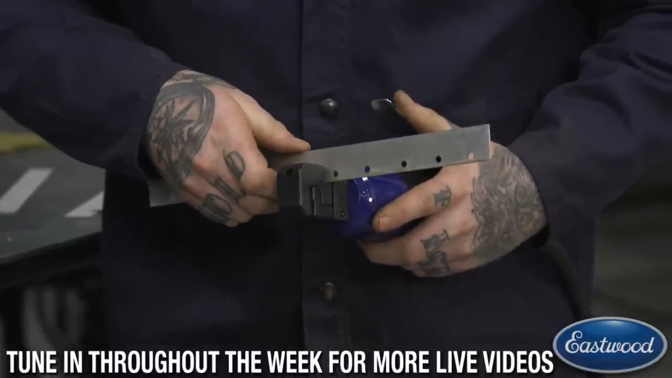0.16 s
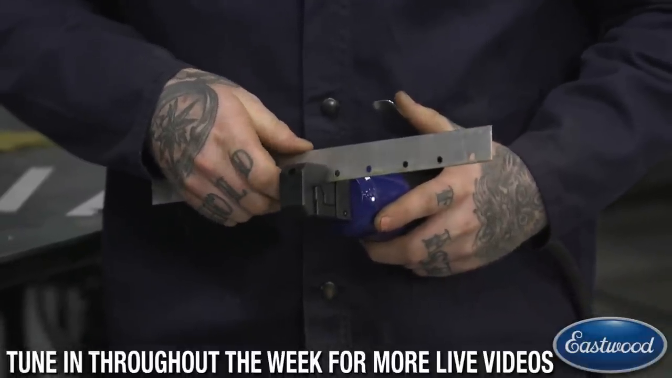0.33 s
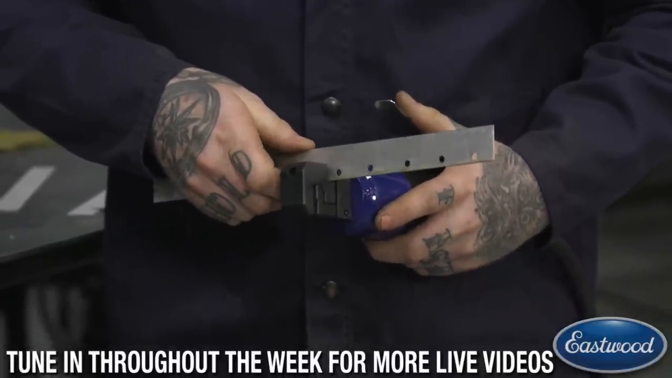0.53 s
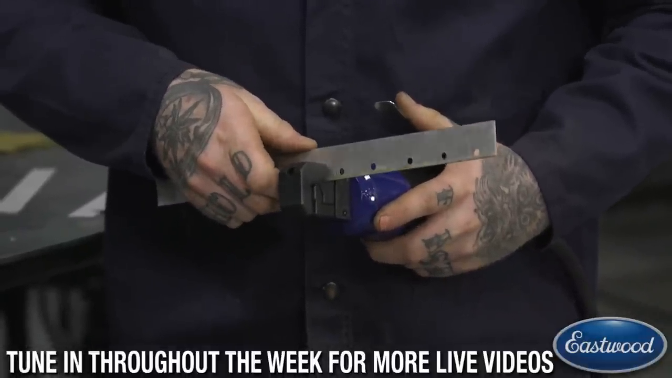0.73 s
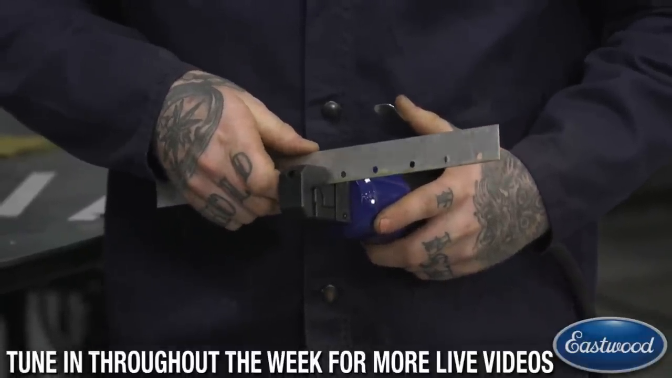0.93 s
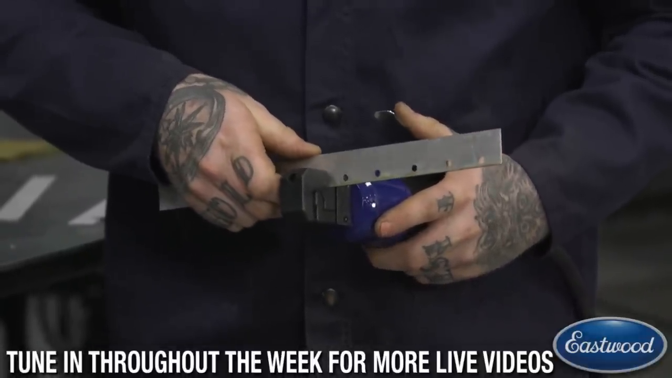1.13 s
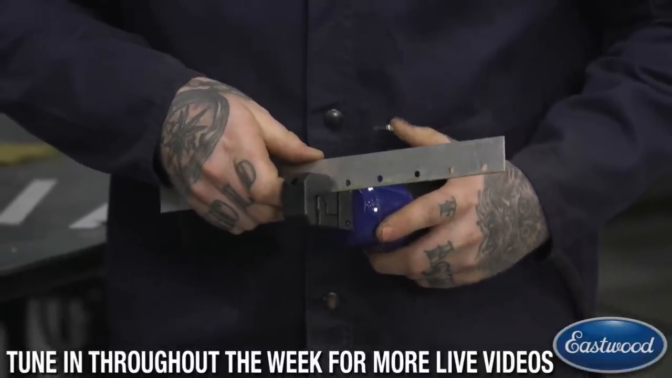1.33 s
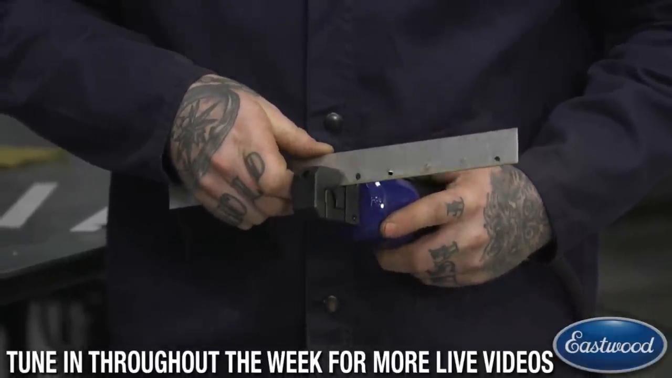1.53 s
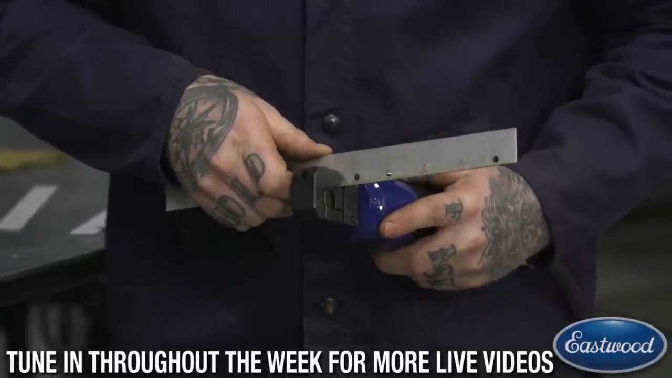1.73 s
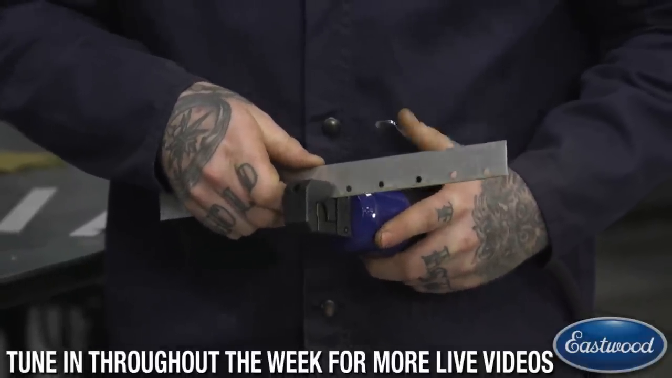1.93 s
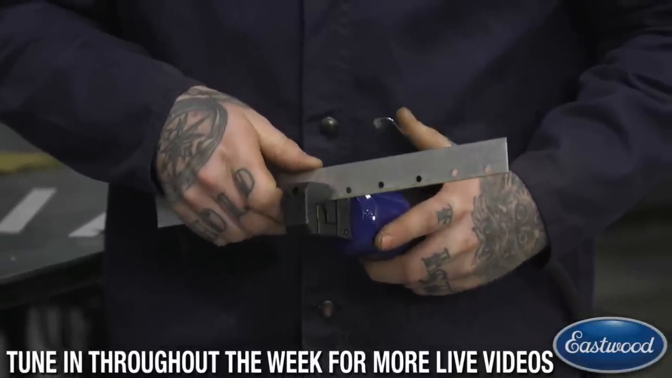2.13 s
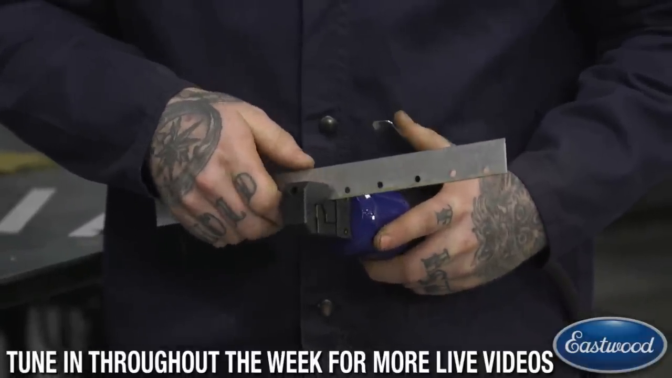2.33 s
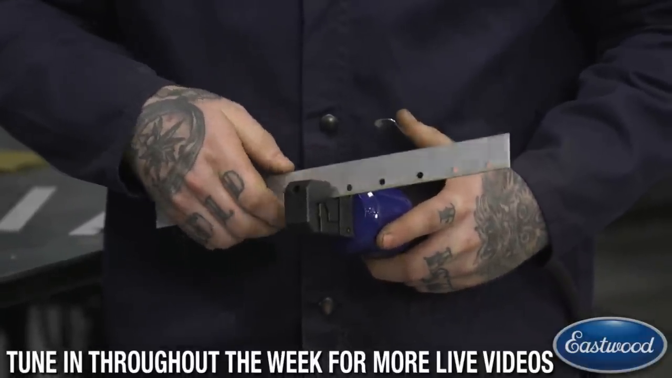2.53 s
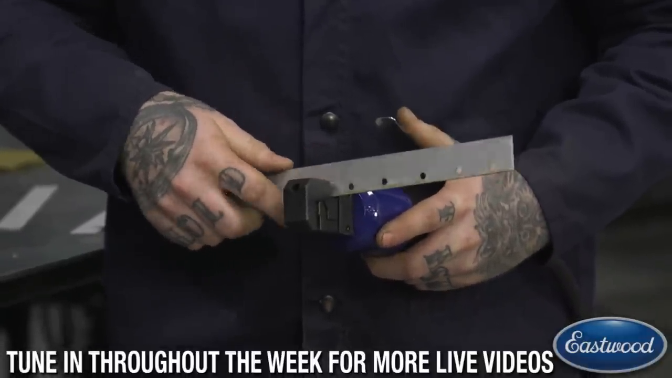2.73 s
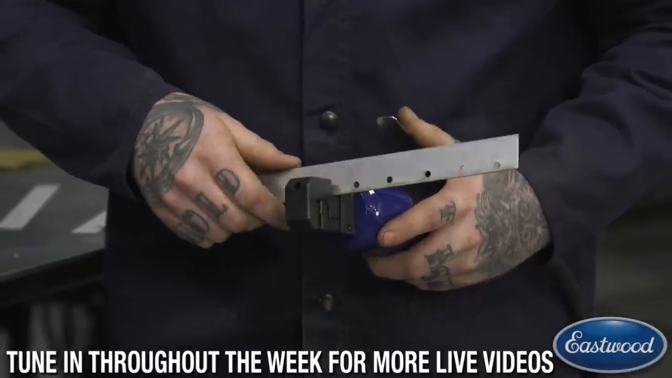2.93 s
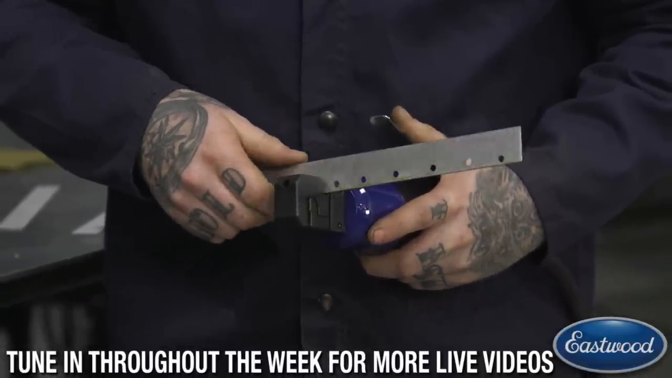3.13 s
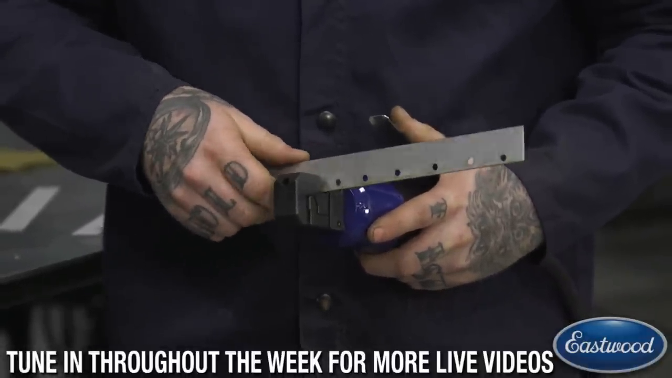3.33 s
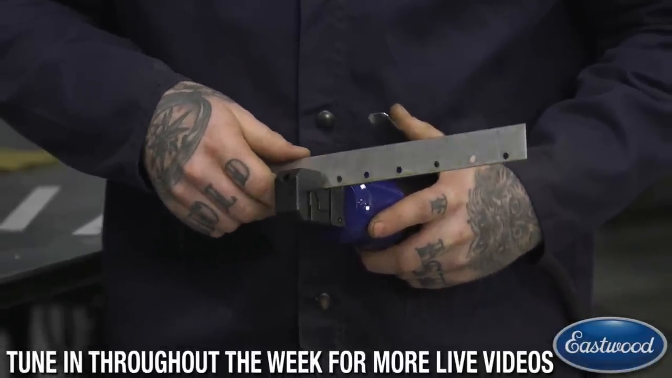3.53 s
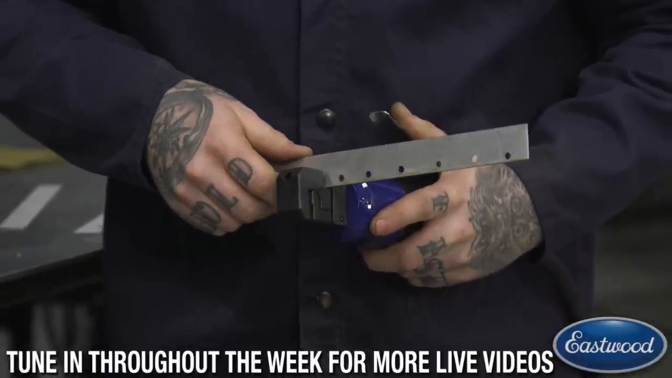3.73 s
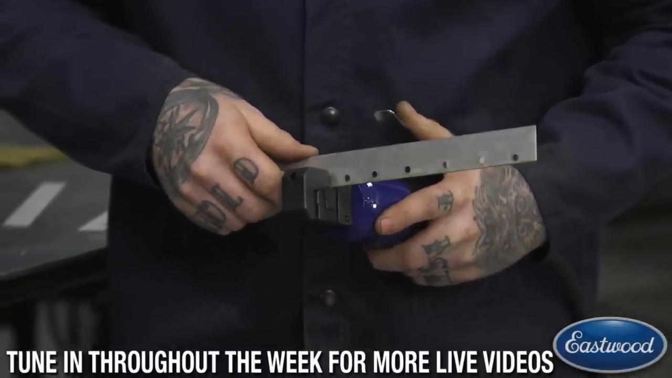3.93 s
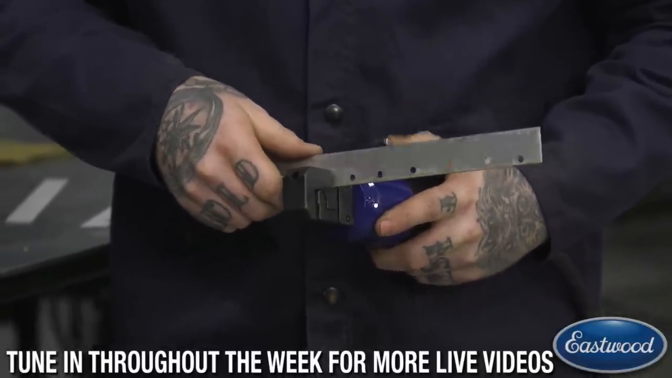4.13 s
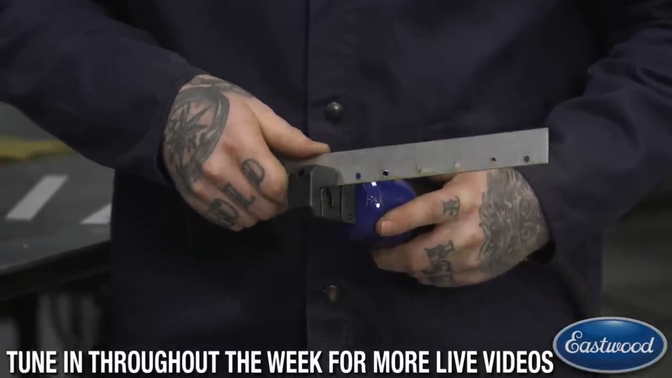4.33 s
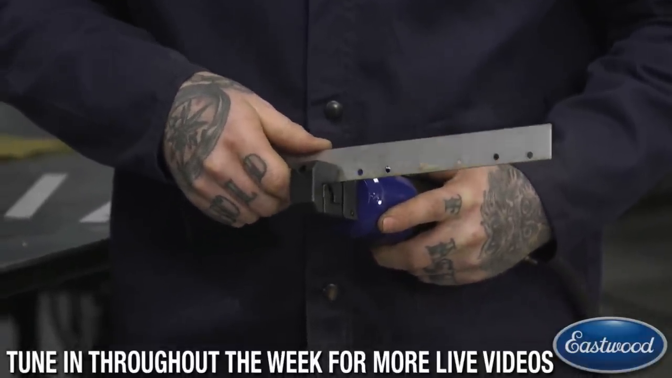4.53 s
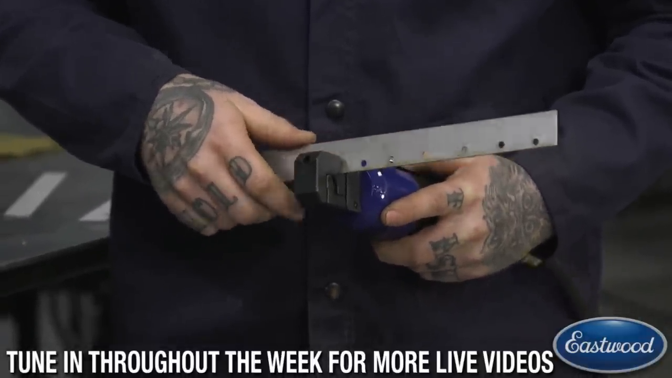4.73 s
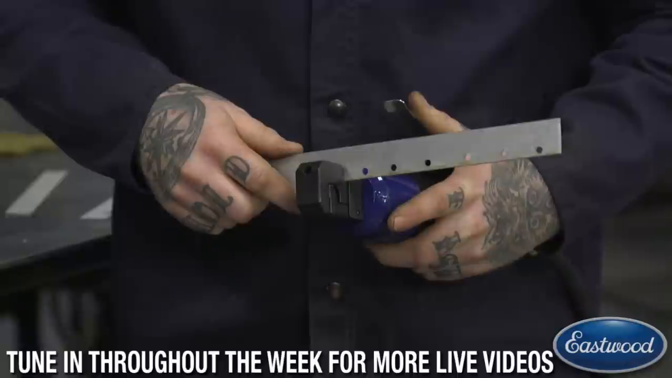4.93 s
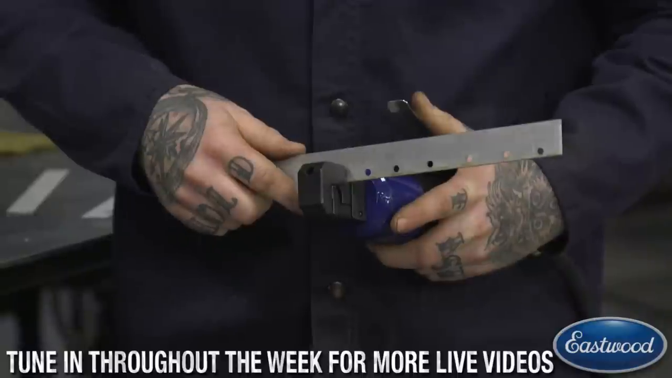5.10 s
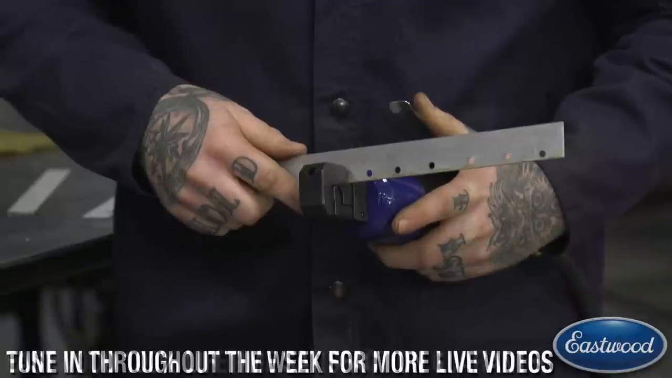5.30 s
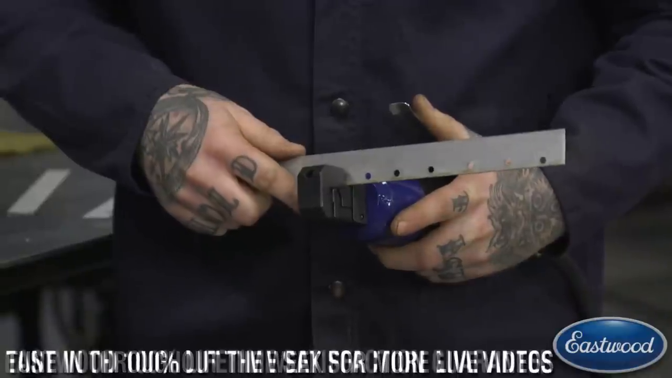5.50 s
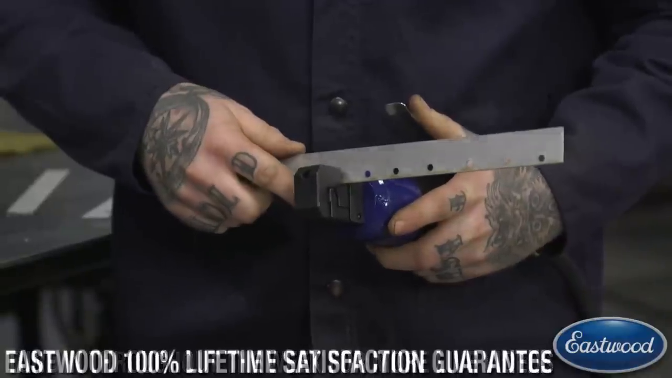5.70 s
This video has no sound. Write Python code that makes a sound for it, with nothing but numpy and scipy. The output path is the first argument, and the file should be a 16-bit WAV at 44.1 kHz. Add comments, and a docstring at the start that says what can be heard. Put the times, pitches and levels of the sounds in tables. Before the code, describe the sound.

Workshop ventilation hums faintly and steadily throughout. At about 1.4 seconds, close to the microphone, a hand-held pneumatic punch goes through a strip of sheet steel: a tiny rush of air, a sharp crack with a very short metallic ring and the thud of the piston, all merging into one loud snap with a slight room echo. At about 1.9 seconds the trigger is released with a light tick, and a loud, bright blast of air escapes for a fraction of a second, then bleeds away in a weak hiss. A few faint metal ticks of handling follow around 2.5 seconds. At about 4.1 seconds the punch snaps through the steel again in the same way. Its release comes at about 4.8 seconds, with another light tick and a short air blast that trails off softly, leaving the quiet hum of the fan.

```python
"""A workshop, ventilation humming behind. Close to the microphone, a hand-held pneumatic punch makes two
holes in a strip of sheet steel. Each time air rushes into the cylinder, the punch cracks through and rings
the jaw, and the piston thuds home. About half a second later the trigger is let go with a light tick:
the air blasts out, then bleeds away as the spring pushes the piston back."""
import sys
import numpy as np
from scipy import signal
from scipy.fft import rfft, irfft, next_fast_len
from scipy.io import wavfile
from scipy.ndimage import map_coordinates

SR = 44100
rng = np.random.default_rng(int(sys.argv[2]) if len(sys.argv) > 2 else 0)


def generate_wav(sig):
    """Save sig (samples, or channels by samples) to the path in sys.argv[1] as 16-bit PCM at SR."""
    pcm = np.round(np.clip(np.atleast_2d(sig).T, -1, 1) * 32767).astype(np.int16)
    wavfile.write(sys.argv[1], SR, pcm)


N = 254012
T = np.arange(N) / SR


def amp(db):
    """Decibels to gain."""
    return 10 ** (np.asarray(db) / 20)


def unit(x):
    """Scale to rms 1."""
    return x / np.sqrt(np.mean(x ** 2) + 1e-20)


def along(points, hz):
    """Read (f/Hz, value) points on a log axis."""
    f, values = np.transpose(points)
    return np.interp(np.log(hz + 1), np.log(f + 1), values)


def filtered(x, response):
    """Filter x by a gain given as a function of frequency."""
    size = next_fast_len(N + 8192)
    return irfft(rfft(x, size) * response(np.fft.rfftfreq(size, 1 / SR)), size)[:N]


def tilt(f, db_per_octave):
    """Gain that slopes the treble, from about 1 kHz up."""
    return amp(db_per_octave * np.log2(f / 1000 + 1))


def noise(spectrum, tilt_db=0):
    """Noise of rms 1 with a given spectrum and treble tilt."""
    return unit(filtered(rng.standard_normal(N), lambda f: amp(along(spectrum, f)) * tilt(f, tilt_db)))


def resonant(modes, tilt_db=0):
    """Noise of rms 1 ringing in resonances of alternating sign, with a treble tilt."""
    def body(f):
        return sum((-1) ** k * amp(db) * 1j * f * width / (hz ** 2 - f ** 2 + 1j * f * width)
                   for k, (hz, width, db) in enumerate(modes))
    return unit(filtered(rng.standard_normal(N), lambda f: body(f) * tilt(f, tilt_db)))


def wobble(rate):
    """A smooth random curve, rate knots a second."""
    return map_coordinates(rng.standard_normal(int(N * rate / SR) + 4), [T * rate])


def flow(start, attack_s, length_s, sag_db, stop_db_per_s):
    """Gain of an air flow: it opens, sags ever faster with the pressure, and dies after length_s."""
    age = T - start
    opening = np.clip(age / attack_s, 0, 1)
    spent = np.clip((age - attack_s) / (length_s - attack_s), 0, 1)
    return opening * amp(-sag_db * spent ** 2 - stop_db_per_s * np.maximum(age - length_s, 0))


def blow(start, db, t60):
    """Gain of a sudden blow that dies away."""
    age = T - start
    return (age >= 0) * amp(db - 60 * np.clip(age / t60, 0, 3))


# fan motor lines: f/Hz, level/dB
FAN_LINES = [(258.4, -75), (333.8, -62.5), (398.4, -73), (667.5, -62.5), (1001, -68), (1147, -68.5),
             (1335, -77.5), (1669, -83.5), (2003, -84), (2336, -85)]
# air in the ducts: f/Hz, level/dB
DUCT_SPECTRUM = [(20, -15), (40, -7), (60, -5.5), (150, -8), (190, -1.5), (300, 1.5), (400, -8),
                 (720, -2.5), (900, -8.5), (1200, -10), (1550, -19), (2800, -22), (4300, -20), (6200, -30),
                 (9300, -32.5), (11000, -31), (13000, -38.5), (15800, -42)]


def ventilation(air_db=-56.5, hum_db=0.5, waver_db=0.67, drift_rad=0.39):
    """In the background, duct noise and the slightly unsteady hum of a fan motor."""
    hum = np.zeros(N)
    for hz, db in FAN_LINES:
        peak = np.sqrt(2) * amp(db + waver_db * wobble(6.7))
        hum += peak * np.sin(2 * np.pi * hz * T + drift_rad * wobble(9) + 2 * wobble(0.98))
    return amp(air_db) * noise(DUCT_SPECTRUM) + amp(hum_db) * hum


# reverberation of the workshop: f/Hz, t60/s
ROOM_DECAY = [(100, .3), (1000, 0.51), (4000, 0.42), (9000, .32), (12000, 0.27), (15500, .2)]


def workshop(x, build_s=0.011, dull_hz=14000):
    """The walls' answer swells and reaches the microphone dulled; each frequency dies at its own speed."""
    hz, t, spectra = signal.stft(rng.standard_normal(SR), SR, nperseg=256)
    decay = amp(-60 * t / along(ROOM_DECAY, hz)[:, None])
    swell = 1 - np.exp(-t / build_s)
    tail = signal.istft(spectra * decay * swell, SR, nperseg=256)[1]
    answer = signal.fftconvolve(x, tail / np.linalg.norm(tail))[:N]
    return filtered(answer, lambda f: 1 / np.sqrt(1 + (f / dull_hz) ** 10))


# metal contacts: the trigger and strip handled, and the returning piston clicking at about 2.44 s: t/s,
# level/dB, t60/s, tilt/(dB/octave)
CONTACTS = [(1.828, -59, 0.099, -1), (1.842, -53.5, 0.045, 0.5), (1.847, -46, 0.012, 0.5),
            (2.4379, -49, 0.072, 0), (2.449, -48.5, 0.03, -1.5), (2.5626, -57.5, 0.053, -7),
            (3.4176, -58.5, 0.029, -3), (4.1118, -49, 0.024, -4), (4.776, -55.5, 0.066, 1.5),
            (4.791, -52.5, 0.068, 6), (4.797, -52.5, .02, 3), (5.5298, -53.5, .03, -6)]
# trigger resonances: f/Hz, width/Hz, level/dB
TRIGGER_MODES = [(1940, 150, 0), (3600, 200, -2.5), (4900, 200, -6), (6000, 300, -3), (7230, 150, 4.5),
                 (8600, 700, -5), (10590, 300, 0.5), (13810, 540, -5), (15210, 500, -9.5)]


def ticks():
    """Light metal contacts of the trigger, the strip and the returning piston, close by but faint."""
    return sum(blow(start, db, t60) * resonant(TRIGGER_MODES, tilt_db)
               for start, db, t60, tilt_db in CONTACTS)


# exhaust port resonances: f/Hz, width/Hz, level/dB
PORT_MODES = [(2180, 390, -1), (4200, 920, -4.5), (5675, 570, -18), (7190, 1000, -18.5), (9880, 700, -20.5),
              (12300, 900, -23.5)]


def sigh(start, rise_per_s=.19, in_tune_s=.19):
    """Noise in the port's resonances, which climb through their listed pitch as the cavity shrinks."""
    def peaks(f):
        return sum(amp(db) / (1 + (2 * (f - hz) / width) ** 2) for hz, width, db in PORT_MODES)
    air = filtered(rng.standard_normal(N), peaks)
    speed = 1 + rise_per_s * (np.clip(T - start, 0, .5) - in_tune_s)
    return unit(map_coordinates(air, [np.cumsum(speed)], mode="wrap"))


# trigger let go, for bleed and exhaust: t/s, wait until the valve opens wide/s, jet level/dB,
# roar relative to jet/dB, time until the cylinder is spent/s, tilt/(dB/octave), bleed level/dB
RELEASES = [(1.8641, 0.007, -12.5, -7, 0.14, 0.48, -53), (4.8184, 0.012, -13, -6, 0.14, 1.1, -56.5)]
# sizzle of the last air: f/Hz, level/dB
SIZZLE_SPECTRUM = [(300, -12), (1200, 0), (1700, -0.5), (3000, 0.5), (3700, -1), (5000, -4), (5700, 5.5),
                   (6400, -2), (7200, 4), (8400, -6), (9700, -1), (10700, -7), (12200, -2.5), (13900, -15),
                   (15100, -14)]


def bleed(after_s=.13, sizzle_db=1.0, sizzle_power=2.9):
    """The spring pushes the piston back: a weak, even flow whose sizzle fades first as it trails off."""
    out = np.zeros(N)
    for release, *_, tilt_db, db in RELEASES:
        start = release + after_s
        air = flow(start, attack_s=.08, length_s=.16, sag_db=-.06, stop_db_per_s=55)
        breath = air * sigh(start)
        sizzle = amp(sizzle_db) * air ** sizzle_power * noise(SIZZLE_SPECTRUM, tilt_db)
        out += amp(db) * (breath + sizzle)
    return out


# bright jet at the outlet: f/Hz, level/dB
JET_SPECTRUM = [(200, -26), (400, -8.5), (1000, -9), (1700, -8.5), (2300, 0), (3100, -6), (3900, 0),
                (5000, -3.5), (7300, 0), (8600, -3.5), (10300, -0.3), (11900, -7.5), (13200, -3.5),
                (14000, -13.5), (15800, -11.5)]
# its low roar: f/Hz, level/dB
ROAR_SPECTRUM = [(25, -12.5), (60, -4), (100, 2.5), (140, 0.5), (200, 3), (300, -0.5), (400, -5.5),
                 (550, 0.5), (1000, -4.5), (2400, -1), (5000, -18.5), (12000, -28)]


def exhaust(leak_db=-15, roar_power=2.3, flutter_db=.5):
    """The valve leaks, then the cylinder dumps its air: a jet that roars only at high pressure."""
    collapse = dict(sag_db=10, stop_db_per_s=341)
    out = np.zeros(N)
    for start, wait_s, db, roar_db, spent_s, tilt_db, _ in RELEASES:
        leak = amp(leak_db) * flow(start, attack_s=.006, length_s=spent_s, **collapse)
        blast = flow(start + wait_s, attack_s=.02, length_s=spent_s - wait_s, **collapse)
        jet = np.hypot(leak, blast)
        hiss = jet * noise(JET_SPECTRUM, tilt_db)
        roar = amp(roar_db) * jet ** roar_power * noise(ROAR_SPECTRUM)
        out += amp(db) * (hiss + roar)
    return out * amp(flutter_db * wobble(330))


# trigger pulled, for inflow, thuds and snaps:
# t/s, inflow level/dB, steel level/dB, steel tilt/(dB/octave), piston level/dB, recoil level/dB
STROKES = [(1.3639, -26.5, -17.5, 1, -23, -44), (4.1204, -29, -17.5, -0.5, -23, -43)]
# hiss at the inlet: f/Hz, level/dB
INLET_SPECTRUM = [(20, -8), (50, -3), (200, 1.5), (450, -3), (850, -1), (1500, -11), (2100, -3), (2800, -9),
                  (3400, -10.5), (4400, -6), (5200, -10), (8000, -9), (10600, -2.5), (13000, -9),
                  (15800, -13.5)]
# valve passages: f/Hz, width/Hz, level/dB
VALVE_MODES = [(7020, 650, -1.5), (9400, 500, -5.5), (10070, 540, -6), (13500, 550, -18)]


def inflow(whistle_db=-5, flutter_db=1, spurt_after_s=.0355):
    """Air sputters through the valve's passages and fills the cylinder until the piston is home."""
    hiss = unit(noise(INLET_SPECTRUM) + amp(whistle_db) * resonant(VALVE_MODES))
    air = np.zeros(N)
    for pull, db, *_ in STROKES:
        fill = flow(pull, attack_s=.0016, length_s=.036, sag_db=10.5, stop_db_per_s=500)
        spurt = blow(pull + spurt_after_s, db=3, t60=.012)  # the piston jumps as the steel gives
        air += amp(db) * (fill + spurt)
    return air * hiss * amp(flutter_db * wobble(400))


# the piston kicks off, lands on its stop and bounces: t after the pull/s, level/dB, f/Hz, t60/s
PISTON_KNOCKS = [(0, -8.5, 350, .012), (.0412, -3.5, 280.2, .014), (.054, -1, 555, .022)]


def thuds(recoil_after_s=.038):
    """Each knock of the piston makes a few damped swings; the whole tool recoils slowly."""
    def swing(start, db, hz, t60):
        return blow(start, db, t60) * np.sin(2 * np.pi * hz * (T - start))
    out = np.zeros(N)
    for pull, *_, piston_db, recoil_db in STROKES:
        out += sum(swing(pull + after, piston_db + db, hz, t60) for after, db, hz, t60 in PISTON_KNOCKS)
        out += swing(pull + recoil_after_s, recoil_db, hz=13, t60=.2)
    return out


# the steel jaw with the strip in it: f/Hz, level/dB, t60/s
JAW_MODES = [(396, -11, 0.0061), (660, -9.5, 0.01), (1130, -7, 0.016), (1790, -8.5, 0.013),
             (2280, -5, 0.016), (2600, -7.5, .024), (3320, -3.5, 0.013), (3570, -5.5, 0.029),
             (4040, -7, .016), (4620, -8, 0.013), (5750, -14, .022), (7530, -11, 0.028),
             (7880, -11.5, 0.036), (9530, -11, 0.025), (13940, -15, .025)]


def jaw(start):
    """One ring of the jaw; the blow starts each mode in a random direction."""
    hz, db, t60 = np.transpose(JAW_MODES)[..., None]
    age = np.arange(SR // 10) / SR
    strength = amp(db) * rng.choice([-1, 1], hz.shape)
    ring = strength * amp(-60 * age / t60) * np.sin(2 * np.pi * hz * age)
    return np.pad(ring.sum(axis=0), (round(start * SR), N))[:N]


# the punch bites twice, breaks through with a double crack, scrapes and rattles:
# t after the pull/s, level/dB, t60/s, jaw ring relative to crack/dB, tilt/(dB/octave)
CRACKS = [(.013, -0.5, .015, -17.5, 3), (0.0219, -2, 0.017, -13.5, 2.5), (.0281, -1, .009, -3, 1.6),
          (.03, -3, .017, 2.5, .5), (.0342, -8, .014, -9.5, -1.5), (.0531, -17, .008, -6, -4.5),
          (.072, -21.5, .055, -14, 2.57)]
# tearing steel: f/Hz, level/dB
CRACK_SPECTRUM = [(60, -15), (300, -3), (1100, 2), (1800, 1), (3000, 2), (5200, -1), (10000, 0),
                  (15800, -8.5)]


def snaps(rise_s=.00034):
    """Close to the microphone the steel tears in a few short cracks, each ringing the jaw."""
    out = np.zeros(N)
    for pull, _, steel_db, steel_tilt_db, *_ in STROKES:
        for after, db, t60, ring_db, tilt_db in CRACKS:
            start = pull + after
            tear = blow(start, db, t60) * np.clip((T - start) / rise_s, 0, 1)
            crack = tear * noise(CRACK_SPECTRUM, tilt_db + steel_tilt_db)
            out += amp(steel_db) * (crack + amp(db + ring_db) * jaw(start))
    return out


def scene(hiss_room_db=-12.5, steel_room_db=-20, jet_room_db=-30):
    """One microphone near the tool, the room well behind; the narrow jet sounds drier than the stroke."""
    hiss = inflow()
    steel = snaps() + thuds() + ticks()
    jet = exhaust() + bleed()
    room = workshop(amp(hiss_room_db) * hiss + amp(steel_room_db) * steel + amp(jet_room_db) * jet)
    return (hiss + steel + jet + room + ventilation())[None]


def record(dry, ceiling=.68, top_hz=15780):
    """The recorder rounds off the highest peaks and keeps nothing above its band limit."""
    rounded = dry[0] / (1 + (dry[0] / ceiling) ** 4) ** .25
    return filtered(rounded, lambda hz: np.clip((top_hz - hz) / 200 + .5, 0, 1))[None]


dry = scene()
out = record(dry)
generate_wav(out)
```